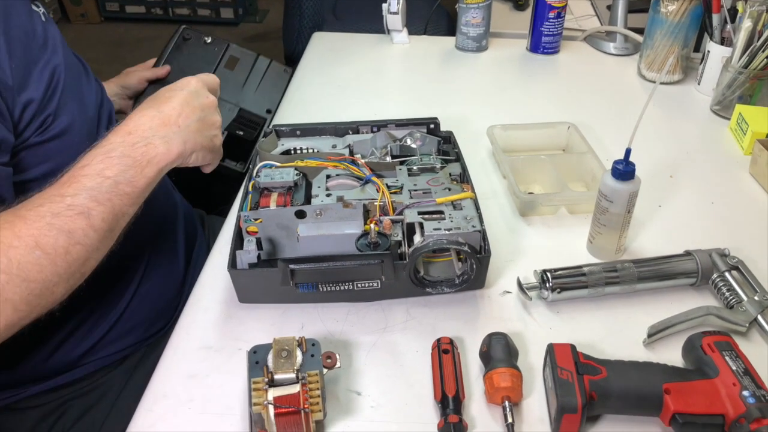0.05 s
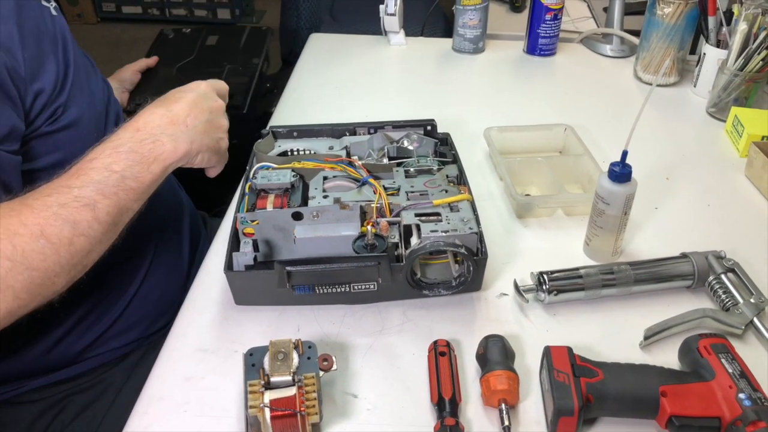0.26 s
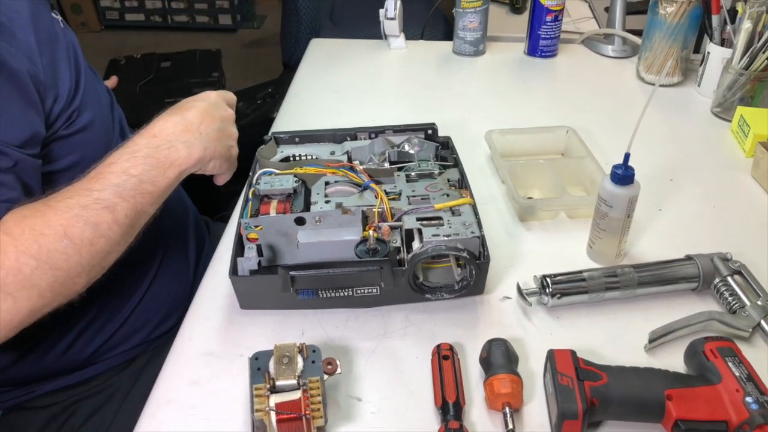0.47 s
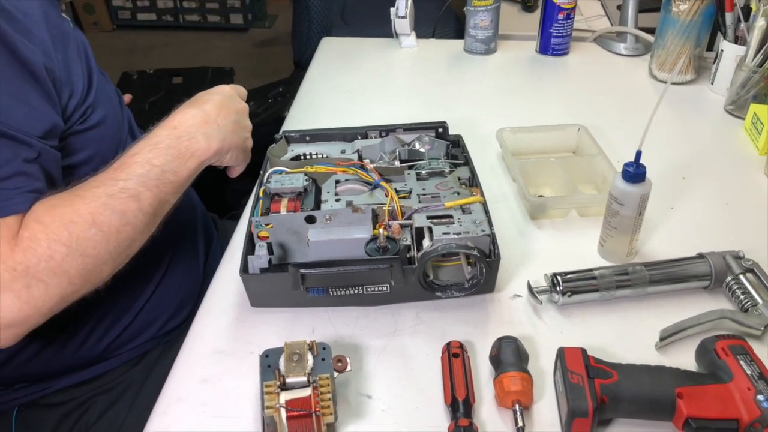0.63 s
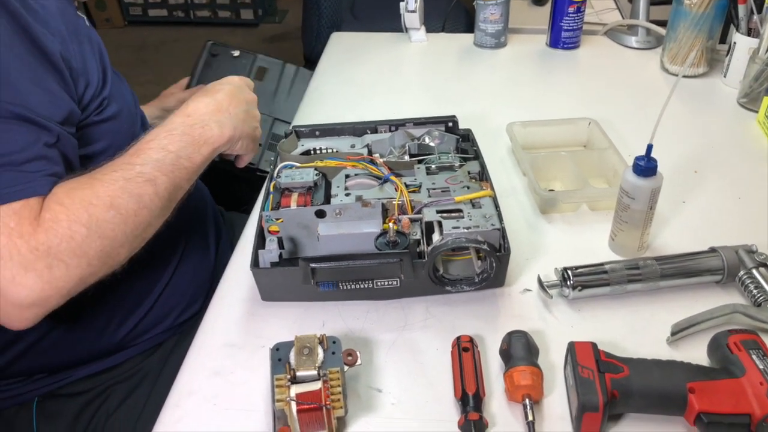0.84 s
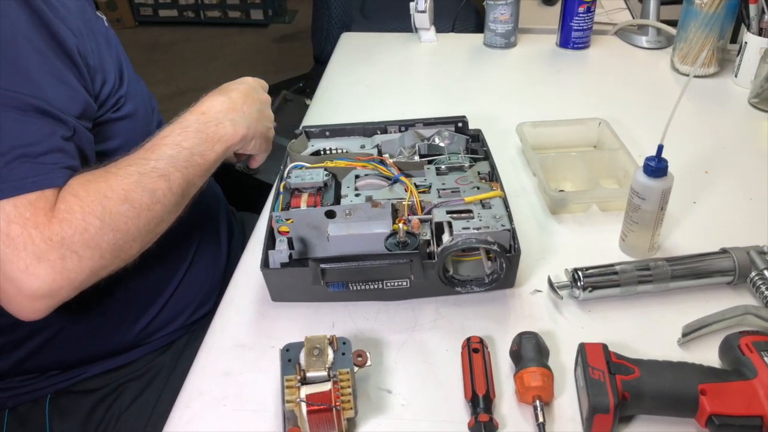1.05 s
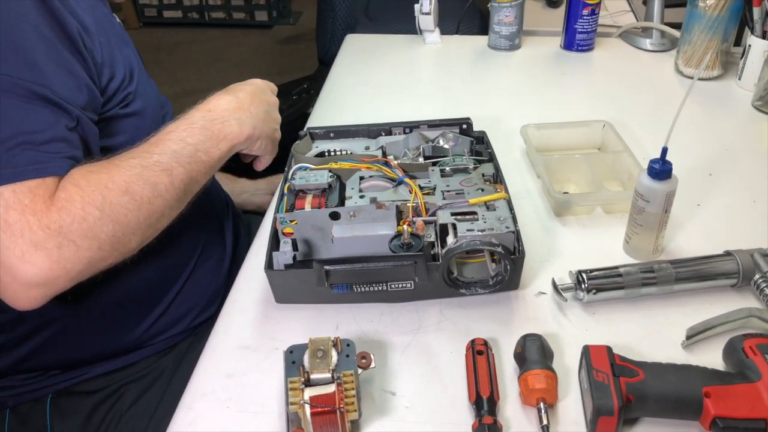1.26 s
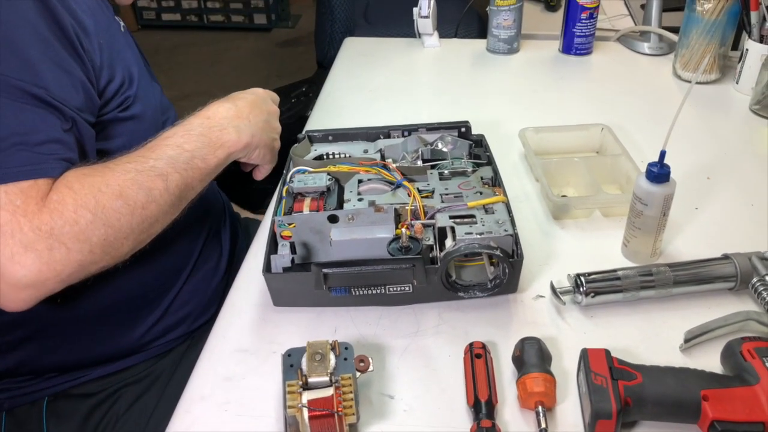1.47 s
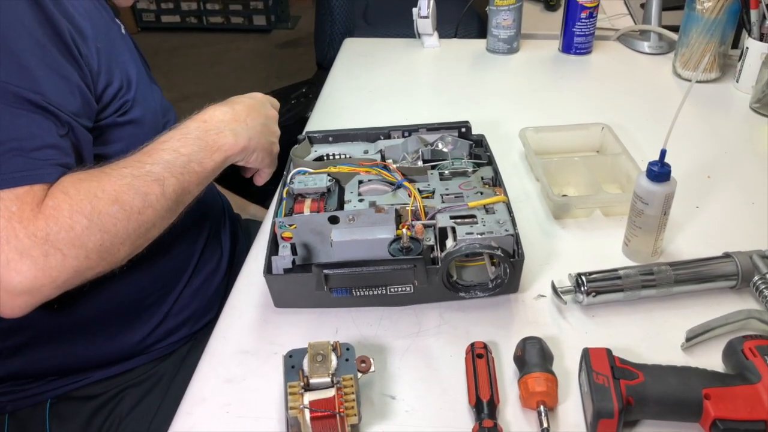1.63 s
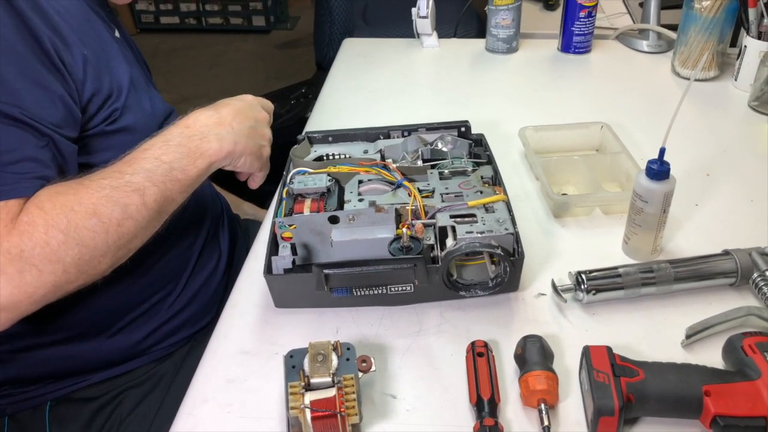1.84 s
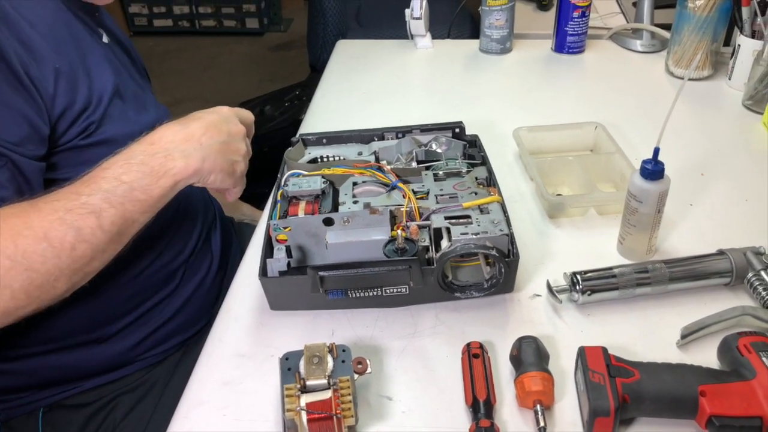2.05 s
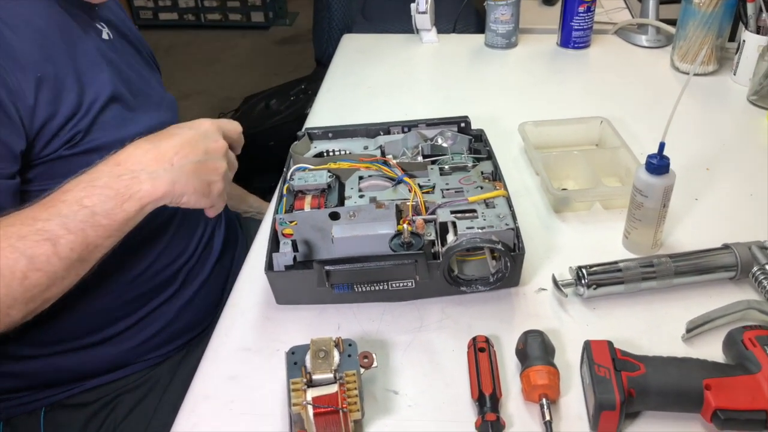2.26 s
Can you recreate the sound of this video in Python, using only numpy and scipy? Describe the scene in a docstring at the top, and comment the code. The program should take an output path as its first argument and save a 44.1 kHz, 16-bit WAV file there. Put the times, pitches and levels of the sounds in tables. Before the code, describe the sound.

A plastic panel unclips with a snap, ticks lightly, then knocks down and rocks to rest

```python
"""A plastic cover with metal parts is handled and laid down beside a workbench in a small workshop.
It clicks, a fastening clip snaps, a hand rustles, edges tick, then the panel knocks down and rocks to rest.
Contacts are sprays of micro-impacts ringing the modes of each part; deep knock notes are pushed resonators.
A diffuse noise tail answers the cover, over faint room tone and hiss, through a mic with a soft top."""
import sys
import numpy as np
from scipy import signal
from scipy.fft import rfft, irfft
from scipy.io import wavfile
from scipy.ndimage import uniform_filter1d

SR = 44100
rng = np.random.default_rng(int(sys.argv[2]) if len(sys.argv) > 2 else 0)


def persist_wave(psi):
    """Save psi, clipped to +-1, as 16-bit WAV."""
    counts = np.round(np.clip(psi, -1, 1) * 32767).astype(np.int16)
    wavfile.write(sys.argv[1], SR, np.atleast_2d(counts).T)


N = 101429


def amp(db):
    """Decibels to amplitude."""
    return 10 ** (np.asarray(db) / 20)


def rms_one(x):
    """Scale to an RMS of one."""
    return x / np.sqrt(np.mean(x ** 2) + 1e-20)


def at_hz(points, hz):
    """Read a (hz, value) curve along a logarithmic frequency axis."""
    point_hz, values = np.array(points).T
    return np.interp(np.log(hz), np.log(point_hz), values)


def band(x, low_hz, high_hz):
    """Band-pass with gentle edges."""
    return signal.sosfilt(signal.butter(2, [low_hz, high_hz], "band", fs=SR, output="sos"), x)


def ring(x, hz, t60):
    """A damped resonator: a unit click sets a sine of height about 1 ringing."""
    fall_s = np.clip(t60, .004, .25)
    r = amp(-60 / (fall_s * SR))
    w = 2 * np.pi * hz / SR
    return signal.lfilter([0, np.sin(w)], [1, -2 * r * np.cos(w), r * r], x)


def contacts(events, modes, lowest_hz):
    """Each contact is a swelling, dying spray of micro-impacts, heard bare and through the part's modes."""
    # limits of the five colour bands, bass to treble: edge_hz
    band_edges = [115, 330, 1000, 3500, 8000, 15800]
    grain_db, grains_per_s = 2.5, 15000  # size scale and mean rate of the micro-impacts
    lead = 0.6  # share of the rise that lies before the listed time
    strike_power = 2.18  # concentrates the strike on the modes around the peak of the spray
    out = np.zeros(N + SR)
    t = np.arange(SR // 2) / SR
    for at_s, peak_db, *colour_db, rise, fall, ring_db in events:
        rise = np.clip(rise, .0003, .03)
        shape = np.minimum(t / rise, 1) * amp(-60 * np.maximum(t - rise, 0) / max(fall, .01))
        sizes = amp(grain_db * np.minimum(rng.exponential(1, len(t)), 4))
        sizes = sizes * rng.choice([-1, 1], len(t))
        hits = rng.random(len(t)) < grains_per_s / SR
        spray = shape * sizes * hits + 1e-18
        strike = spray * shape ** strike_power
        body = spray + sum(amp(ring_db + db) * ring(strike, hz, t60) for hz, db, t60 in modes)
        start = int((at_s - lead * rise) * SR)
        for k, db in enumerate(colour_db):
            # alternate polarity where neighbouring bands overlap
            part = (-1) ** k * band(body, band_edges[k], band_edges[k + 1])
            loudest = np.sqrt(uniform_filter1d(part ** 2, size=SR // 40).max())  # RMS over 25 ms
            out[start:start + len(t)] += amp(peak_db + db) * part / loudest
    return signal.sosfilt(signal.butter(4, lowest_hz, "high", fs=SR, output="sos"), out[:N])


def hum():
    """Steady room tone and microphone hiss: noise shaped by a spectrum curve."""
    # spectrum of the background: pitch_hz, relative_db (per Hz)
    spectrum = [(15, -39), (25, -6.5), (113, 4), (227, -14), (703, -11.5), (782, -17.5), (871, -17.5),
                (1380, -20), (1850, -21.5), (12500, -30), (15500, -38.5)]
    level_db = -68.5  # RMS
    hz = np.maximum(np.fft.rfftfreq(N, 1 / SR), 1)
    shaped = rfft(rng.standard_normal(N)) * amp(at_hz(spectrum, hz)) * (hz > 36)
    return amp(level_db) * rms_one(irfft(shaped, N))


def click():
    """A single light, bright click: one contact through short, high modes."""
    # click: at_s, peak_db, then against it bass_db, low_mid_db, mid_db, presence_db, treble_db;
    # rise_s, fall_s (to -60 dB), ring_db
    events = [(.028, -54.5, -6, -12.5, -9, -5.5, -10.5, 0.0083, 0.1, -17.5)]
    # ringing of the clicking part: pitch_hz, level_db, fall_s (to -60 dB)
    modes = [(2800, 0, .01), (3700, 5, .012), (6900, 2, .008), (14200, 6, .008)]
    return contacts(events, modes, 174)


def clip_snap():
    """The fastening clip lets go: a sharp contact with high, narrow modes."""
    # snap: at_s, peak_db, then against it bass_db, low_mid_db, mid_db, presence_db, treble_db;
    # rise_s, fall_s (to -60 dB), ring_db
    events = [(.2455, -22, -46, -21, -17, -12.5, -7, 0.0051, 0.086, -40)]
    # ringing of the fastening clip: pitch_hz, level_db, fall_s (to -60 dB)
    modes = [(1394, -3, .12), (2546, 6, .03), (4600, 4, .03), (5500, 22, .006), (5037, -3, .07),
             (5219, -1, .08), (5797, -3, .06), (6160, -1, .07), (6560, -2, .07)]
    return contacts(events, modes, 340)


def hand():
    """The hand shifts on the cover: dull friction noise that swells with the grip."""
    # loudness of the rustle: at_s, level_db
    grip = [(.54, -99), (.56, -75), (.6, -80), (.635, -67.5), (.675, -60.5), (.72, -69), (.74, -74),
            (.78, -74), (.82, -78), (.86, -78), (.9, -86)]
    at_s, db = np.transpose(grip)
    level_db = np.interp(np.arange(N) / SR, at_s, db, left=-120, right=-120)
    friction = band(band(rng.standard_normal(N), 170, 420), 170, 420)  # twice, for steeper edges
    return amp(level_db) * rms_one(friction)


def edge_ticks():
    """Edges of the cover tick: small contacts through mid-range modes."""
    # ticks: at_s, peak_db, then against it bass_db, low_mid_db, mid_db, presence_db, treble_db;
    # rise_s, fall_s (to -60 dB), ring_db
    events = [(.679, -54, -14, -5, -12, -36, -23, 0.0085, 0.053, -53),
              (.735, -60.5, -3, -24, -2, -16, -13, 0.0038, 0.076, -54),
              (.76, -56.5, -41, -7, -1, -17.5, -20, 0.0031, 0.073, -51),
              (.935, -50, -35, -10, -5, -15.5, -15.5, 0.0011, 0.13, -64),
              (.969, -54, -54, -7, -9.5, -22, -22, 0.0011, 0.13, -56),
              (1.081, -72.5, -11.5, 11, -12, -3, -12, 0.0058, 0.19, -62),
              (1.1, -49, -13, -19.5, -1, -7, -11.5, .0023, 0.13, -43),
              (1.136, -49.5, -26, -10.5, -3, -30, -38, .003, 0.086, -38),
              (1.162, -51, -18, -24, -5.5, -25, -22, 0.0028, 0.077, -57),
              (1.248, -57, -15, -4.5, -8.5, -18, -21, 0.0016, 0.45, -56)]
    # ringing of the edges: pitch_hz, level_db, fall_s (to -60 dB)
    modes = [(300, 0, .06), (540, 0, .06), (880, -4, .04), (1190, 6, .12), (1650, 0, .04), (2250, 0, .04),
             (3050, 0, .03)]
    return contacts(events, modes, 170)


def tab_pings():
    """A tab pings: quick contacts that strongly excite two high modes."""
    # pings: at_s, peak_db, then against it bass_db, low_mid_db, mid_db, presence_db, treble_db;
    # rise_s, fall_s (to -60 dB), ring_db
    events = [(1.019, -58, -37, -10, -2, -18, -22, 0.00078, 0.14, -18.5),
              (1.224, -60, -21, -8, -16, -9, -31, 0.00085, 0.15, -15)]
    # ringing of the tab: pitch_hz, level_db, fall_s (to -60 dB)
    modes = [(3100, 0, .02), (4850, 6, .03)]
    return contacts(events, modes, 310)


def panel_knocks():
    """The panel knocks down: heavier contacts through its low, hollow modes."""
    # knocks: at_s, peak_db, then against it bass_db, low_mid_db, mid_db, presence_db, treble_db;
    # rise_s, fall_s (to -60 dB), ring_db
    events = [(1.369, -40, -4, -1, -14, -24, -23.5, .003, 0.18, -38),
              (1.408, -40, -4, -1, -21.5, -23, -26, 0.0029, 0.14, -39),
              (1.428, -47, -3, -6, -7, -17, -21, .01, .15, -67),
              (1.475, -29, -15, -7.5, -21, -18, -21, 0.0068, 0.093, -45),
              (1.488, -29.5, -9, -14.5, -12, -13.5, -12, .012, 0.2, -56.5),
              (1.608, -42, -6, -6.5, -22, -24, -26, 0.0056, 0.19, -57),
              (1.649, -49, 2, -2.5, -10, -8.5, -16, 0.0069, 0.12, -40.5),
              (1.714, -35, -10, -6.5, -11, -35, -9, 0.0093, 0.19, -43),
              (1.726, -31.5, -29, -24, -17, -10, -17.5, .009, 0.13, -53),
              (1.867, -48, -30, -9.5, -20.5, -16.5, -26, 0.014, 0.28, -53),
              (1.904, -48.5, -10, -6.5, -19, -25, -25, 0.0077, 0.075, -47),
              (1.95, -55.5, -2, -8, -12.5, -22, -24.5, 0.0099, 0.14, -60)]
    # ringing of the panel: pitch_hz, level_db, fall_s (to -60 dB)
    modes = [(161, 10, .14), (184, 10, .14), (225, 9, .14), (270, 4, .08), (349, 9, .1), (380, 3, .1),
             (555, 2, .08), (610, 4, .08), (730, 3, .08), (1040, 0, .07), (1116, 0, .07), (1570, -3, .07),
             (1672, -3, .07), (5500, 24, .006)]
    return contacts(events, modes, 73)


def knock_low_notes():
    """The deep notes of the panel knocks: smooth pushes into low, damped resonators."""
    # low notes of the knocks: at_s, push_db, pitch_hz
    low_notes = [(1.371, -41, 98), (1.374, -46, 328), (1.409, -46, 84), (1.412, -38, 358),
                 (1.478, -42, 164.4), (1.488, -28.5, 228), (1.52, -51, 90), (1.559, -46, 74.6),
                 (1.608, -48, 85), (1.651, -59, 164), (1.715, -40, 192), (1.724, -42, 81),
                 (1.811, -50.5, 174.6), (1.906, -46.5, 145.2), (1.946, -47, 171), (2.029, -54.5, 84),
                 (2.09, -53.5, 157), (2.128, -61, 77)]
    push_s = 0.0031  # length of each push
    fall_cycles = 44  # cycles to die by 60 dB; ring() holds the fall to 0.25 s at most
    out = np.zeros(N)
    soft = signal.windows.hann(int(push_s * SR))
    for at_s, db, hz in low_notes:
        push = np.zeros(N)
        push[int(at_s * SR)] = amp(db)
        push = np.convolve(push, soft / soft.sum())[:N] + 1e-18
        out += ring(push, hz, fall_cycles / hz)
    return band(out, 55, 2000)


def rim_rocks():
    """The cover rocks to rest: contacts through the modes of its rim."""
    # rocks: at_s, peak_db, then against it bass_db, low_mid_db, mid_db, presence_db, treble_db;
    # rise_s, fall_s (to -60 dB), ring_db
    events = [(1.973, -34, -17.5, -21, -13.5, -21, -14, 0.0051, 0.21, -35.5),
              (1.996, -42.5, -15.5, -17.5, -19, -11, -35, 0.0033, 0.26, -71),
              (2.076, -38, -24, -16.5, -18, -17, -15.5, 0.0057, 0.11, -32),
              (2.188, -50.5, -36, -8, -17.5, -16.5, -28, 0.005, 0.11, -49)]
    # ringing of the rim: pitch_hz, level_db, fall_s (to -60 dB)
    modes = [(175, 0, .08), (371, -3, .12), (454, -3, .12), (740, 2, .08), (783, 9, .12), (1042, 3, .1),
             (1590, 1, .08), (1642, 0, .08)]
    return contacts(events, modes, 125)


def workshop(x):
    """Diffuse tail: octave bands of noise that build up fast and die at their own rate."""
    # reverberation of the workshop: pitch_hz, fall_s (to -60 dB)
    room_falls = [(100, 0.87), (500, 0.22), (1500, 0.34), (4000, 0.44), (8000, 0.39), (15000, 0.13)]
    room_db, build_s = -7, 0.0036  # level of the tail and time constant of its build-up
    t = np.arange(SR) / SR
    edges = 62.5 * 2 ** np.arange(9)
    tail = np.zeros(SR)
    for low, high in zip(edges, edges[1:]):
        fall_s = at_hz(room_falls, np.sqrt(low * high))
        tail += band(rng.standard_normal(SR), low, high) * amp(-60 * t / fall_s)
    tail *= 1 - np.exp(-t / build_s)
    return amp(room_db) * signal.fftconvolve(x, tail / np.sqrt(np.sum(tail ** 2)))[:N]


def scene():
    """The cover and its room tail, with the dry low notes and the background."""
    cover = click() + clip_snap() + hand() + edge_ticks() + tab_pings() + panel_knocks() + rim_rocks()
    room = workshop(band(cover, 200, 14000))
    return (cover + room + knock_low_notes() + hum())[None]


def record(dry):
    """The microphone rolls off gently, then the top is cut steeply."""
    mic_top_hz, cutoff_hz = 11700, 16600  # -3 dB point; where the steep cut reaches 60 dB
    dry = signal.sosfilt(signal.butter(1, mic_top_hz, fs=SR, output="sos"), dry)
    return signal.sosfilt(signal.cheby2(12, 60, cutoff_hz, fs=SR, output="sos"), dry)


dry = scene()
out = record(dry)
persist_wave(out)
```